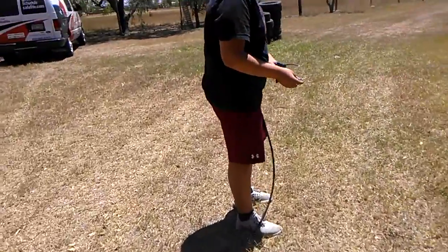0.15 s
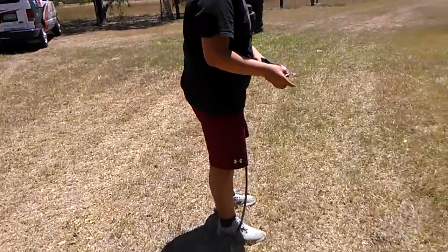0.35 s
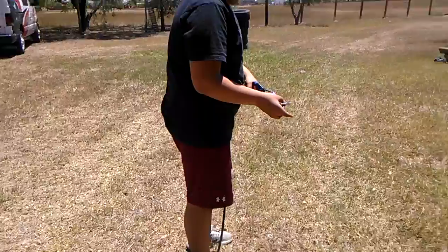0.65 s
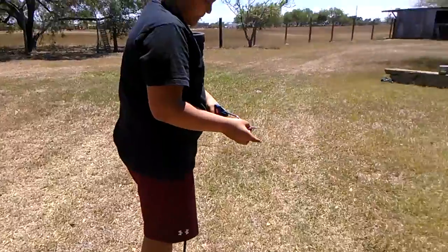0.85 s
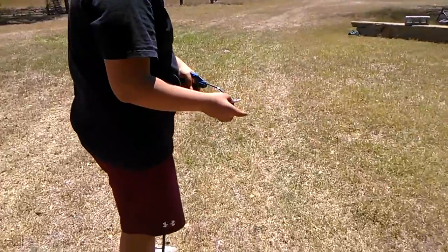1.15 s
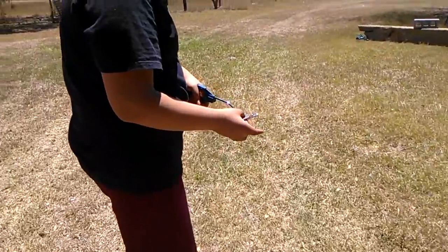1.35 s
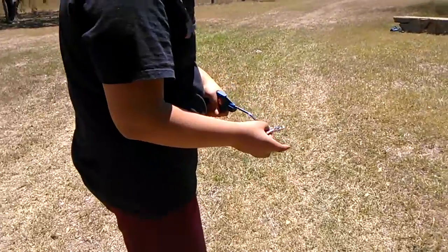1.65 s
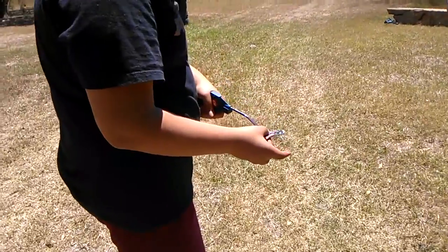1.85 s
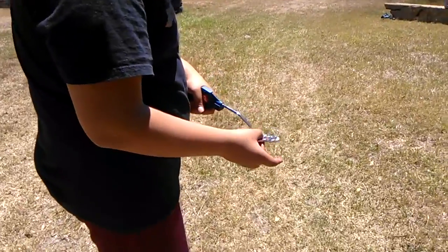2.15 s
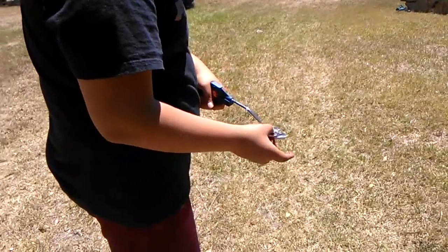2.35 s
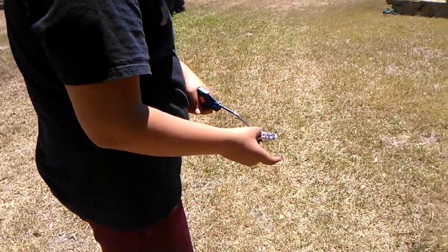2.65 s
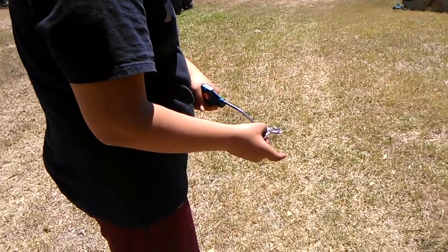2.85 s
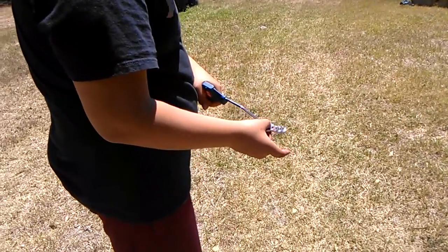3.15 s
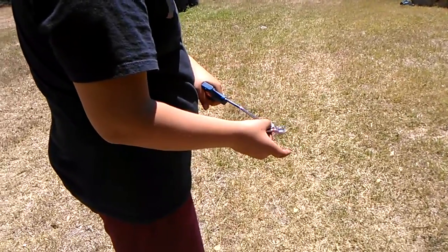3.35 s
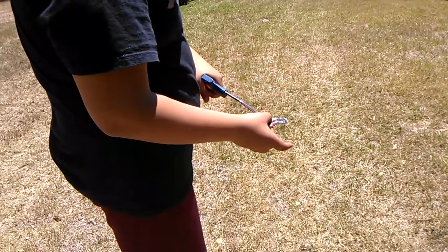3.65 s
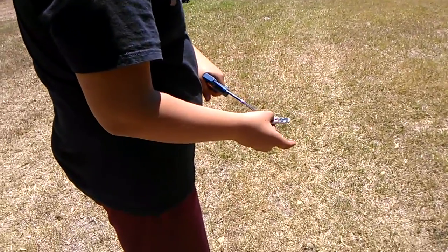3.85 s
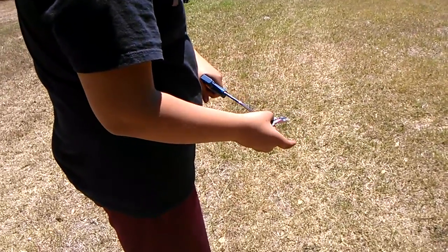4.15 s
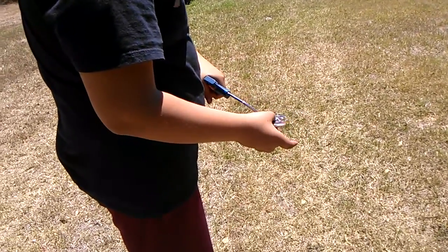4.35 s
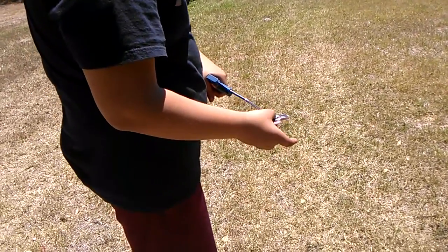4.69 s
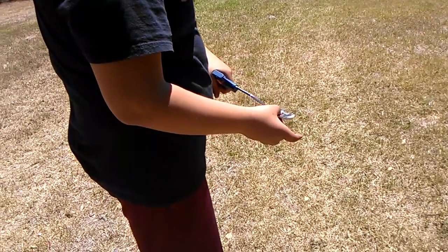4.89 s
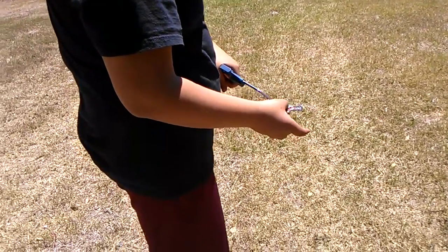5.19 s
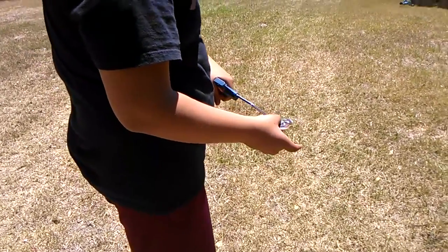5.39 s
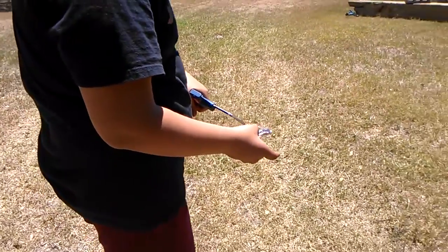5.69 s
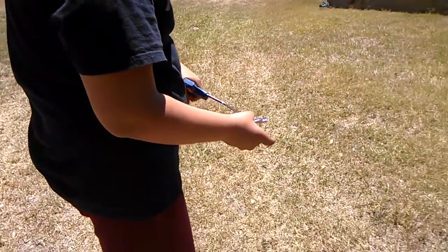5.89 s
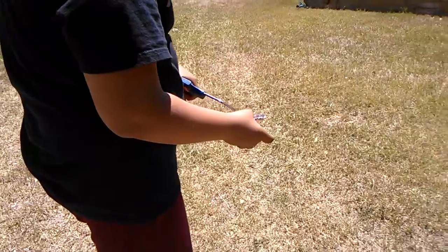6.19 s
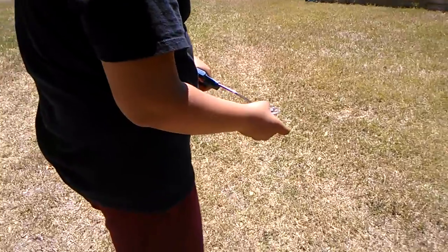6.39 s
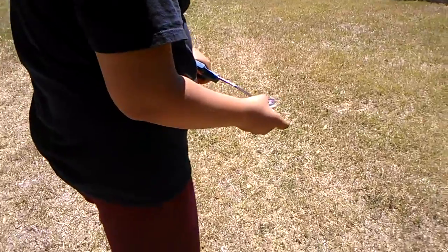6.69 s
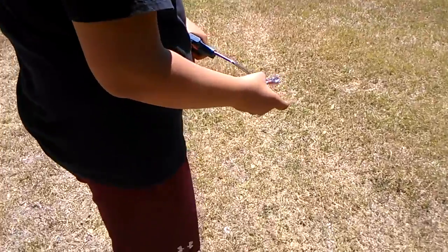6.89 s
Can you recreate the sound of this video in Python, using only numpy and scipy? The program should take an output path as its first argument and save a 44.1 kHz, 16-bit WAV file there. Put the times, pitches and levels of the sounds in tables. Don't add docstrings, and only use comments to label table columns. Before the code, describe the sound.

Low blustery wind pops come first, with barely audible seeping air. A trigger opens abruptly with a sharp spit, and compressed air roars as dense, sizzling white noise, close, wide and dry, without room echo. It flickers and sways as the aim shifts over a spinning toy, then becomes quieter and more hollow. Small wind puffs remain, and the cheap microphone sounds strained and slightly watery.

```python
import sys
import numpy as np
from scipy import signal
from scipy.io import wavfile
from scipy.ndimage import uniform_filter1d

SR = 44100
rng = np.random.default_rng(int(sys.argv[2]) if len(sys.argv) > 2 else 0)


def wav_out(sig):
    wavfile.write(sys.argv[1], SR, np.round(np.clip(np.atleast_2d(sig).T, -1, 1) * 32767).astype(np.int16))


N = 310023


def from_db(db):
    return 10 ** (np.asarray(db) / 20)


def rms_one(x):
    return x / np.sqrt(np.mean(x ** 2, axis=-1, keepdims=True) + 1e-20)


def in_time(rows, s=None):
    when, *columns = np.transpose(rows)
    at = np.arange(N) / SR if s is None else s
    return [np.interp(at, when, column) for column in columns]


def at_hz(points, hz):
    point_hz, value = np.transpose(points)
    return np.interp(np.log(hz + 1), np.log(point_hz), value)


def drift(rate, count, size):
    r = np.exp(-2 * np.pi * rate)
    noise = rng.standard_normal((count, size + 2000))
    settled = signal.lfilter([1], [1, -2 * r, r * r], noise)[:, 2000:]
    return rms_one(settled)


def band(x, low_hz, high_hz, order=2):
    return signal.sosfilt(signal.butter(order, [low_hz, high_hz], "band", fs=SR, output="sos"), x)


def noise_frames():
    return signal.stft(rng.standard_normal((2, N)), SR, nperseg=512, noverlap=384)


def to_sound(left, right):
    return signal.istft(np.array([left, right]), SR, nperseg=512, noverlap=384)[1][:, :N]


def resonance_db(hz, modes):
    return sum(db / (1 + (2 * (hz - f) / width) ** 2) for f, width, db in modes)[:, None]


def split(level_db, pan_db):
    return from_db(level_db + 8.5) / np.sqrt(1 + from_db([-2 * pan_db, 2 * pan_db]))


PART_HZ = [11000, 6800, 3400, 1100]
# frequency_hz, density_db per Hz
JET_COLOUR = [(59, -11), (100, -24), (369, -19.5), (401, -23), (547, -18.5), (777, -17.5), (2020, -13.5),
              (3180, -11), (3670, -8.5), (3990, -9), (5560, -6), (8070, -6.5), (9530, -0.5), (11000, -2),
              (14100, -9)]
# centre_hz, width_hz, lift_db
HOLLOWS = [
    (3030, 220, 4.5),
    (4070, 280, 4),
    (4880, 350, 1),
    (8200, 2700, -3.5),
    (8050, 200, -2),
    (1600, 600, -6),
]


def splashed_colour(hz, s, splash, bearing):
    since = np.maximum(s - VALVE[0][0], 0)
    build = np.exp(-since / 0.32)
    shear = 0.49 * splash - 1.1 * bearing - 4.5 * build
    rush = 0.86 * splash - 11 * build
    parts = [0 * splash, shear, splash, rush]
    rising_hz = np.log(PART_HZ[::-1])
    weights = [np.interp(np.log(hz + 1), rising_hz, row[::-1]) for row in np.eye(4)]
    colour = at_hz(JET_COLOUR, hz)[:, None] + np.transpose(weights) @ parts
    aim = np.clip(0.05 + splash / 11.6, 0, 1)
    return colour + resonance_db(hz, HOLLOWS) * aim


# frequency_hz, left_minus_right_db
JET_BALANCE = [(60, 2), (130, -1), (280, -6), (610, -4), (1330, -3), (2900, -2.0), (6290, -1.5), (13700, 4)]


def jet_pan(hz, splash, bearing):
    high = np.clip((hz[:, None] - 4500) / 2500, 0, 1)
    low_pan = -0.69 * bearing - 0.12 * splash
    return at_hz(JET_BALANCE, hz)[:, None] + high * bearing + (1 - high) * low_pan


# frequency_hz, likeness 0-1
LIKENESS = [(300, 0.13), (1500, 0), (2600, 0.52), (3500, 0.2), (4200, 0.54), (4900, 0.8), (6000, 0),
            (7800, 0.5), (8800, 0.63), (9900, 0.5), (11200, 0.43), (13000, 0.12)]
# frequency_hz, left_lead_radians
LEAD_FAR = [(500, 0), (5000, 0.6), (7500, 0.045), (10000, 0.53), (14000, 0.34)]
# frequency_hz, left_lead_radians
LEAD_NEAR = [(500, -4.5), (4800, 1.11), (6200, 2.5), (8000, 2), (9100, 1.97), (10100, 4), (11400, 1.5),
             (13000, 13)]
# start_s, share of the near lead 0-1
TURN = [
    (0.85, 1),
    (1.15, 0.21),
    (1.6, 0.85),
    (1.75, 1),
    (5.7, 0.92),
    (5.95, 0.58),
]


def reach_ports(hz, s, one, other):
    alike = np.clip(at_hz(LIKENESS, hz), 0, .99)[:, None]
    near, = in_time(TURN, s)
    lead = np.outer(at_hz(LEAD_FAR, hz), 1 - near) + np.outer(at_hz(LEAD_NEAR, hz), near)
    return one, alike * one * np.exp(-1j * lead) + np.sqrt(1 - alike ** 2) * other


# start_s, level_db
VALVE = [
    (0.361, -46),
    (0.370, 0),
    (0.372, 3),
    (0.380, -1),
    (0.40, 1.5),
]


def open_valve(hiss):
    opening = from_db(in_time(VALVE)[0]) * (np.arange(N) > VALVE[0][0] * SR)
    body = signal.sosfiltfilt(signal.butter(2, 5000, fs=SR, output="sos"), hiss)
    later = np.concatenate([np.zeros(round(0.014 * SR)), opening])[:N]
    return (hiss - body) * opening + body * later


# start_s, nozzle level_db, aim at the toy as splash_db, nozzle bearing as left_minus_right_db
JET = [(0.4, -10, -2, -3), (0.49, -9.5, -4, -1), (0.7, -11, 1.5, 0), (0.98, -14, 2.5, -1.5),
       (1.17, -13, -1, -1), (1.42, -11.5, -2, -1.5), (1.56, -13.5, -0.5, -1.5), (2.3, -12.5, 1, 1),
       (2.73, -12, 0, 0.5), (3.19, -13, 0.5, 0.5), (4.6, -13.5, 1, 0), (4.85, -15, 3, 1.5),
       (5.16, -17.5, 4, 2.5), (5.44, -16.5, 5, 3), (5.75, -19, 7, 2), (5.94, -25.5, 10.5, 2),
       (6.55, -28, 12.5, 1.5), (7.03, -26, 7.5, 2.5)]
# centre_hz, width_hz, lift_db
PORTS = [
    [(10800, 1720, 6), (12200, 1200, 0), (9000, 700, 0)],
    [(9650, 930, 7), (7650, 1500, 4.5), (5760, 1220, 3.5)],
]


def jet(shared_db, patchy_db):
    hz, s, (one, other) = noise_frames()
    _, splash, bearing = in_time(JET, s)
    colour = splashed_colour(hz, s, splash, bearing)
    pan = jet_pan(hz, splash, bearing)
    strip = (hz / 350).astype(int)
    step = s[1] - s[0]
    sides = []
    for noise, port, half_pan in zip(reach_ports(hz, s, one, other), PORTS, (pan / 2, -pan / 2)):
        shared = shared_db * drift(21.0 * step, count=1, size=len(s))
        patchy = patchy_db * drift(19.5 * step, count=64, size=len(s))[strip]
        sides.append(noise * from_db(colour + half_pan + shared + patchy + resonance_db(hz, port)))
    hiss = to_sound(*sides)
    hiss = hiss / np.std(hiss[:, 2 * SR:4 * SR])
    return from_db(in_time(JET)[0] + 6.0) * open_valve(hiss)


# start_s, lobe pitch_hz, level_db
SPIN = [
    (3.0, 297.3, -45),
    (3.5, 353, -45.5),
    (4.0, 373, -48.5),
    (4.7, 382.4, -45),
    (4.9, 352, -58),
    (5.1, 323.7, -48),
    (5.6, 344.3, -59),
    (6.0, 372, -51),
    (6.5, 371.5, -47),
    (7.03, 372.6, -51),
]


def toy():
    hum_hz, hum_db = in_time(SPIN)
    unsteady_hz = 5.16 * drift(12.0 / SR, count=1, size=N)[0]
    phase = 2 * np.pi * np.cumsum(hum_hz + unsteady_hz) / SR
    hum = np.sin(phase) + from_db(-4) * np.sin(phase / 2)
    wobble = from_db(4 * drift(9 / SR, count=1, size=N) - 2)
    return np.sqrt(2) * hum * wobble * from_db(hum_db) * from_db([[1.5], [-1.5]])


# start_s, peak level_db, ring pitch_hz, left_minus_right_db, decay_s
SLAPS = [(0.028, -6, 215, 23, 0.029), (0.086, -12, 256, 13, 0.026), (0.101, -8, 240, 14, 0.023),
         (0.117, 1, 161, 17, 0.017), (0.125, 1.5, 316, 24, 0.02), (0.15, 3, 168, 12, 0.012),
         (0.183, -12, 171, 26, 0.019), (0.205, 4, 201, 21.5, 0.01), (0.247, -3, 297, 30, 0.025),
         (0.258, -11, 121, 24.0, 0.03), (0.28, 0, 400, 30, 0.01), (0.295, 7.5, 233, 37, 0.027),
         (0.325, -0.5, 143, 30, 0.033), (0.331, 1, 420, 28, 0.013), (0.345, -8, 137, 14, 0.022),
         (1.307, -27, 269, -14, 0.036), (2.349, -16, 175, -10, 0.055), (4.01, -9, 268, -34, 0.02)]


def slaps():
    out = np.zeros((2, N))
    t = np.arange(SR // 10) / SR
    signs = rng.choice([-1, 1], (len(SLAPS), 1))
    edges = rms_one(band(rng.standard_normal((len(SLAPS), len(t))), 450.0, 940.0))
    for (s, db, hz, pan_db, t60), sign, edge in zip(SLAPS, signs, edges):
        bright_edge = from_db(-9) * edge * from_db(-200 * t / t60)
        ring = np.sin(2 * np.pi * hz * t) + bright_edge
        soft_attack = 1 - np.exp(-t / 0.0025)
        ring = sign * ring * from_db(-60 * t / t60) * soft_attack
        i = round(s * SR)
        out[:, i:i + len(t)] += ring * split(db + 0.5, pan_db)[:, None]
    return out


# middle_s, length_s, rumble level_db, left_minus_right_db, flutter relative_db
GUSTS = [(0.005, .1, -16, 18, -20), (0.127, 0.086, -21.5, 5, -4), (0.195, 0.047, -17.5, 22, -5.5),
         (0.322, .12, -16.5, 17, 2), (0.535, 0.11, -21.5, 9, -7.5), (0.627, 0.12, -22.5, 29, 9),
         (0.797, 0.13, -26.5, 23, 1.5), (0.915, 0.089, -27, 12, -8), (1.058, 0.1, -23.5, 20, -7),
         (1.169, 0.052, -27, -13, -10.5), (1.305, 0.034, -19, -28, -2.5), (1.458, 0.16, -26, -6, -13),
         (4.675, 0.29, -27, -22, -5.5)]
# middle_s, length_s, rumble level_db, left_minus_right_db
PUFFS = [(1.86, 0.15, -34.5, 5.5), (2.046, 0.11, -32, -9), (2.19, 0.18, -36, -3), (2.352, 0.055, -29, -8),
         (2.456, .05, -28, 11), (2.585, 0.14, -31.5, 6), (3.12, 0.061, -36, -3), (3.287, 0.074, -24.5, -15),
         (3.463, 0.14, -40, -1), (3.632, 0.043, -34, -14), (4.01, 0.12, -33, -3), (4.155, .04, -33, 14),
         (4.28, 0.11, -35, 10), (4.42, 0.066, -30.5, -25), (5.041, 0.049, -37, 6), (5.35, 0.042, -36, 1),
         (5.723, .07, -34.5, -21), (5.843, 0.16, -40, -12), (6.156, 0.13, -49, 3), (6.3, 0.076, -35, -6),
         (6.769, 0.15, -34, 15), (7.0, 0.17, -36, 13)]


def wind(lumpy_db):
    puff_flutter_db, lull_db, lull_flutter_db = -7.5, -49, 2
    edge_db, flatness = -7, 2.14
    t = np.arange(0, N + 64, 64) / SR
    rumble_power = np.full((2, len(t)), from_db(2 * lull_db))
    flutter_power = rumble_power * from_db(2 * lull_flutter_db)
    for s, length, db, pan_db, flutter_db in GUSTS + [(*puff, puff_flutter_db) for puff in PUFFS]:
        swell = from_db(2 * edge_db * np.abs(2 * (t - s) / length) ** flatness)
        rumble_power = rumble_power + np.outer(split(db - 0.5, pan_db) ** 2, swell)
        flutter_power = flutter_power + np.outer(split(db + flutter_db - 3.0, 1.9 * pan_db) ** 2, swell)
    lumps = from_db(lumpy_db * drift(40.0 / SR, count=2, size=N))
    rumble = rms_one(band(rng.standard_normal((2, N)) * lumps, 43, 164.4, order=3))
    flutter = rms_one(band(rng.standard_normal((2, N)) * lumps, 188, 510, order=3))
    rumble_gain = in_time(np.column_stack([t, *np.sqrt(rumble_power)]))
    flutter_gain = in_time(np.column_stack([t, *np.sqrt(flutter_power)]))
    return rumble * rumble_gain + flutter * flutter_gain


# start_s, level_db
LEAK = [
    (0.0, -40.5),
    (0.35, -45),
]
# frequency_hz, density_db per Hz
LEAK_COLOUR = [(1000, -19), (1400, -13), (1700, 1), (2000, -5.5), (3100, -9.5), (3900, -8.5), (4250, -1.5),
               (4700, -9), (6400, -12.5), (9200, -1), (10500, 2), (11700, -5), (14100, -14)]
# frequency_hz, left_minus_right_db
LEAK_BALANCE = [(1300, -9), (2200, 4), (4100, -15), (7500, -9), (10800, -3), (13700, 5)]


def leak():
    hz, _, (one, other) = noise_frames()
    colour = at_hz(LEAK_COLOUR, hz)[:, None]
    pan = at_hz(LEAK_BALANCE, hz)[:, None]
    left = one * from_db(colour + pan / 2)
    right = (0.29 * one + 1.0 * other) * from_db(colour - pan / 2)
    hiss = to_sound(left, right)
    return hiss / np.std(band(hiss, 2700, 9600)) * from_db(in_time(LEAK)[0] + 1.0)


# frequency_hz, threshold_db against the neighbourhood
THINNING = [(1800, -8), (2400, -4), (2900, -1.2), (5200, -1.2), (5700, -3.4), (8400, -3.2), (9000, -6),
            (11500, -5), (13500, -3.4)]
# frequency_hz, threshold_db per dB of shade
SHADING = [(2500, .25), (5500, .25), (6400, 1.4), (7600, 1.2), (8700, .9), (9200, 0)]


def thin(x, depth_db):
    hz, _, z = signal.stft(x, SR, nperseg=2048, noverlap=1536)
    power = np.abs(z) ** 2 + 1e-20
    power = power + .7 * power[::-1]
    strand = uniform_filter1d(uniform_filter1d(power, size=3, axis=1), size=4, axis=2)
    around = uniform_filter1d(uniform_filter1d(power, size=60, axis=1), size=4, axis=2)
    margin_db = 10 * np.log10(strand / around) - at_hz(THINNING, hz)[:, None]
    loudest = around[:, (hz > 9000) & (hz < 11500)].mean(axis=1, keepdims=True)
    shade_db = 10 * np.log10(loudest / around)
    shade_db = shade_db - np.median(shade_db, axis=2, keepdims=True)
    margin_db = margin_db - np.clip(shade_db * at_hz(SHADING, hz)[:, None], -3, 3)
    dropped = np.clip(.5 - 2 * margin_db, 0, 1) * (hz[:, None] > 1800)
    return signal.istft(z * from_db(-depth_db * dropped), SR, nperseg=2048, noverlap=1536)[1][:, :N]


def scene():
    return jet(shared_db=0.75, patchy_db=2.0) + toy() + slaps() + wind(lumpy_db=4.0) + leak()


def low_pass(x):
    return signal.sosfilt(signal.butter(12, 14270, fs=SR, output="sos"), x)


def record(dry):
    top = .9
    trimmed = signal.sosfilt(signal.butter(2, 52.0, "high", fs=SR, output="sos"), dry)
    squeezed = trimmed / (1 + np.abs(trimmed / top) ** 6) ** (1 / 6)
    mix = thin(squeezed, depth_db=28)
    return low_pass(mix)


dry = scene()
out = record(dry)
wav_out(out)
```